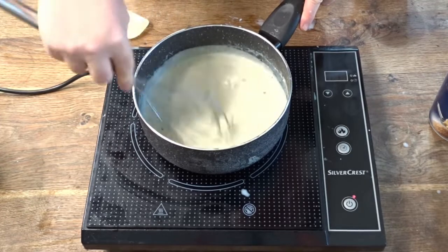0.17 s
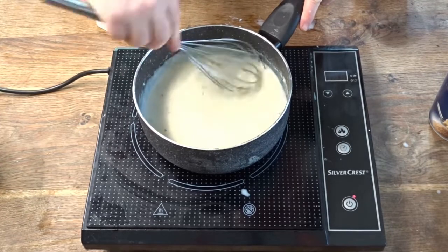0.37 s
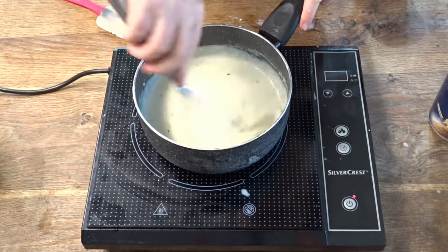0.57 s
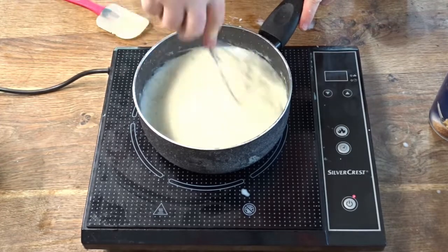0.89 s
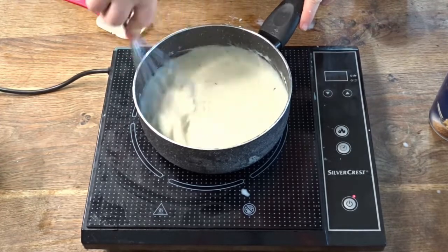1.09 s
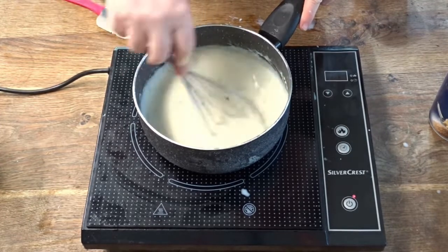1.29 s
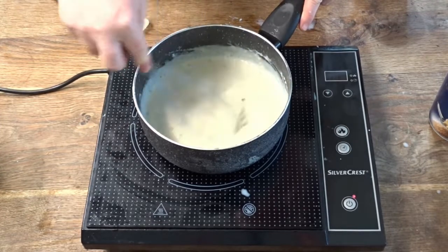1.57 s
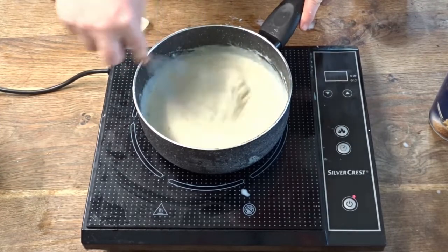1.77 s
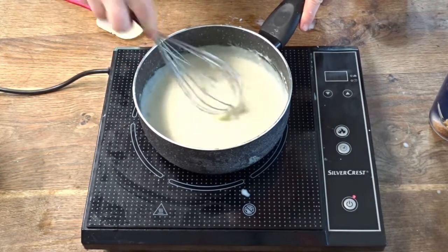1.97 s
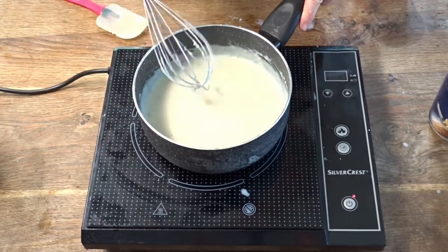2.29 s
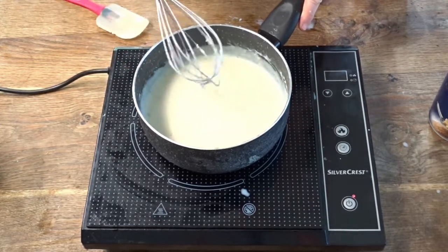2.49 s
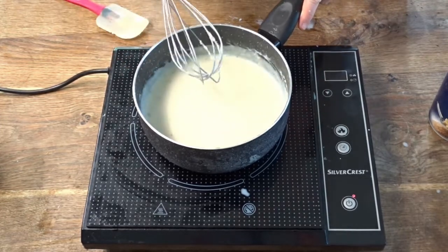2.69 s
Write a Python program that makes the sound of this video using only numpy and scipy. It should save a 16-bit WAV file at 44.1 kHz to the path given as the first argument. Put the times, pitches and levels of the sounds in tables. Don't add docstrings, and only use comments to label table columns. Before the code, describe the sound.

Metal whisk stirring thick sauce in a small pan, quick bright scratchy strokes, then sharp rattling taps

```python
import sys
import numpy as np
from scipy import signal
from scipy.fft import rfft, irfft
from scipy.io import wavfile
from scipy.ndimage import uniform_filter1d

SR = 44100
rng = np.random.default_rng(int(sys.argv[2]) if len(sys.argv) > 2 else 0)


def master_out(mix):
    frames = np.transpose(np.atleast_2d(mix))
    ceiling = np.clip(frames, -1, 1)
    pcm = np.round(ceiling * 32767).astype(np.int16)
    wavfile.write(sys.argv[1], SR, pcm)


def gain_from_db(level_db):
    decades = np.asarray(level_db, float) / 20
    return 10 ** decades


N = 125685

# f/Hz, density/dB
AIR_COLOUR = [(20, -23), (60, -6), (140, -3), (300, -2), (700, -2), (1100, -10), (4000, -13.5),
              (16000, -26)]
# f/Hz, t60/s
KITCHEN_DECAY = [(200, 0.55), (1500, 0.39), (8000, 0.26), (15000, 0.11)]
# f/Hz, level/dB
KITCHEN_WIDTH = [(200, -15), (600, -16), (1400, -16.5), (2800, -13), (5000, -22), (8000, -12.5),
                 (14000, -7)]

# peak t/s, half length/s, pan scrape level/dB, wire jingle level/dB
STROKES = [(0.028, 0.057, -33.5, -44.5), (0.149, 0.02, -30, -39), (0.179, 0.024, -34, -33),
           (0.267, 0.028, -34, -41.5), (0.301, 0.024, -31, -37), (0.382, 0.014, -40.5, -43),
           (0.474, 0.019, -41.5, -35.5), (0.515, 0.0059, -50, -30.5), (0.605, 0.048, -27.5, -24.5),
           (0.71, 0.075, -37, -20.5), (0.794, 0.06, -28.5, -30.5), (0.892, 0.012, -32.5, -21),
           (0.971, 0.067, -35, -35), (1.015, 0.037, -33, -52), (1.138, 0.024, -26.5, -24.5),
           (1.184, 0.024, -25, -25), (1.259, 0.032, -35.5, -34), (1.335, 0.059, -34, -42.5),
           (1.484, 0.029, -31.5, -45), (1.595, 0.021, -31.5, -40), (1.698, 0.028, -28.5, -34.5),
           (1.795, 0.026, -28.5, -35), (1.888, 0.029, -31, -41), (1.94, 0.073, -45.5, -77)]
# peak t/s, half length/s, f/Hz, width/Hz, level/dB
PAN_SWELLS = [(0.043, 0.025, 1500, 70, -34), (.06, .02, 1700, 60, -38), (.476, 0.02, 1545, 35, -46),
              (0.153, 0.012, 1546, 80, -22.5), (0.158, 0.027, 1090, 49.7, -41),
              (0.254, 0.008, 1640, 100, -31), (0.296, 0.021, 1737, 45, -35), (0.318, 0.0056, 835, 79, -48),
              (0.597, 0.011, 1217, 79.5, -30.5), (0.705, 0.0051, 890, 100, -28),
              (0.759, 0.028, 760, 107, -29), (1.053, 0.013, 1540, 79.5, -35.5),
              (1.176, 0.024, 1500, 132, -23.5), (1.156, 0.045, 856, 113, -33),
              (1.354, 0.023, 1540, 100, -36), (1.486, 0.031, 1350, 150, -34.5),
              (1.51, 0.1, 810, 59.7, -46.5), (1.69, 0.052, 1380, 153, -34)]
# peak t/s, half length/s, f/Hz, width/Hz, level/dB
WIRE_CATCHES = [(0.053, 0.014, 8200, 150, -38.5), (0.16, 0.0078, 8500, 150, -42),
                (0.296, 0.018, 5260, 119, -36), (0.47, 0.01, 8800, 197, -45.5),
                (0.575, 0.016, 8300, 200, -28.5), (0.651, 0.045, 8250, 350, -22),
                (0.682, 0.028, 5500, 100, -36), (.78, 0.033, 7950, 250, -30),
                (0.957, 0.048, 8200, 197, -33.5), (1.023, 0.026, 7450, 120, -39.5),
                (1.112, .015, 5560, 50, -36), (1.133, 0.016, 7950, 200, -28),
                (1.182, 0.018, 3300, 500, -27), (1.592, 0.0091, 7600, 80, -33),
                (1.63, 0.021, 5050, 60, -52)]
# f/Hz, level/dB, t60/s
PAN_MODES = [(1211, 4, 0.014), (1486, -2, 0.016), (1650, -4, 0.018), (2824, -8, 0.04), (3340, -4.5, 0.025),
             (5250, -10, 0.02)]
# f/Hz, level/dB, t60/s
WIRE_MODES = [(3046, -5.5, 0.23), (4030, -12, 0.18), (4520, -30, 0.42), (5080, 1, 0.39), (5590, -1.5, 0.4),
              (6700, -15, 0.73), (7560, -15, 0.66), (8500, -2, 0.6)]
# f/Hz, density/dB
SCRATCH_COLOUR = [(180, -79), (300, -44), (584, -20), (737, -8), (1080, -10), (1340, -2), (2480, -10.5),
                  (8360, -10.5), (16000, -22.5)]
# f/Hz, density/dB
JINGLE_COLOUR = [(1180, -77), (2000, -20.5), (5390, -10.5), (6090, -12), (8330, 0), (16000, -33.5)]

# peak t/s, half length/s, f/Hz, width/Hz, level/dB
RUMBLES = [(0.16, 0.053, 383, 25, -51.5), (0.466, 0.017, 405, 23, -45.5), (0.498, 0.028, 253, 20, -48),
           (0.62, 0.026, 290, 30, -49.5), (0.78, 0.063, 392, 37, -41.5), (0.903, 0.019, 269, 35, -43.5),
           (1.1, 0.097, 350, 120, -47), (1.282, 0.025, 378, 23, -46), (2.325, 0.019, 393, 24, -54),
           (2.317, 0.0045, 1530, 80, -39.5), (2.322, 0.0075, 940, 41, -46), (2.621, 0.03, 957, 13, -48),
           (2.3, 0.0041, 1572, 45, -37), (2.592, 0.011, 610, 53, -44), (2.589, .012, 250, 61, -53.5),
           (2.531, .04, 147, 21, -60.5), (2.717, 0.0071, 1562, 55, -36.5)]
# peak t/s, half length/s, f/Hz, width/Hz, level/dB
WIRE_HAZE = [
    (2.15, .15, 2200, 100, -64),
    (2.1, .06, 3865, 20, -69),
    (2.1, .1, 1976, 30, -70),
    (2.45, .1, 3865, 30, -70),
]

# t/s, blow level/dB, rattle level/dB, rattle t60/s, pan share/dB
KNOCKS = [(.451, -49, -38, 0.22, -7), (0.549, -22, -38, .1, -27), (1.0907, -21.5, -17, 0.055, -17),
          (1.0969, -22, -44, 0.12, -18.5), (2.309, -18.5, -28, 0.39, -14), (2.316, -21, -26.5, 0.19, -20),
          (2.375, -31, -45, 0.11, -20), (2.578, -21, -27, 0.47, -13.5), (2.586, -19.5, -31, 0.15, -21),
          (2.64, -25.5, -35, 0.088, -17), (2.7089, -21.5, -30.5, 0.24, -10.5)]
# t/s, level/dB
CLICKS = [
    (0.383, -52),
    (.4514, -39),
    (.5162, -49),
    (.88, -36),
    (1.3867, -36),
    (1.459, -43),
    (1.7918, -32),
    (1.811, -32),
    (2.3125, -26),
]
# t/s, level/dB
CRACKS = [
    (1.0895, -31),
    (1.0955, -32),
    (2.308, -31),
    (2.5768, -32),
    (2.5835, -35),
    (2.7078, -33),
]
# f/Hz, level/dB, t60/s
STRUCK_TIP = [(1200, -20, .3), (3063, -11, .24), (3774, -9, .17), (4533, -11, .28), (5103, -12, .22),
              (5588, -1, .25), (6670, -9, .28), (7515, -3, .3), (7897, -3, .36), (8775, 0, .19),
              (10220, -13, .24), (11970, -17, .27)]
# f/Hz, level/dB, t60/s
STRUCK_BELLY = [(958, -13, .3), (1572, -13, .22), (3058, -15, .25), (4570, -16, .25), (5599, -19, .3),
                (6697, -1, .35), (7843, -7, .4), (8253, -1, .26), (8516, -11, .4), (8947, 0, .2),
                (9313, 0, .2), (10320, -11, .23)]
# f/Hz, level/dB, t60/s
STRUCK_NECK = [(1567, -10, .1), (3499, -17, .15), (5561, -21, .16), (6702, -15, .25), (7472, -7, .2),
               (7843, -5, .4), (8290, 0, .24), (9308, -16, .3), (11860, -20, .2)]
# f/Hz, density/dB
TICK_COLOUR = [(300, -45), (1500, -25), (5500, -13), (8100, 4), (11000, -9), (16000, -16)]
# f/Hz, density/dB
CRACK_COLOUR = [(1000, -25), (5000, -4), (8500, 3), (13500, 2), (16000, 0)]

# f/Hz, level/dB
SINGING_WIRES = [(2196, -67), (3860, -61), (5803, -69), (6347, -61), (7790, -69)]

AIR_DB, AIR_WIDTH, ROOM_DB = -52.5, 0.23, -10
SLIPS_PER_S, JINGLES_PER_S, SLIP_SPREAD_DB = 3500, 3100, 2.2
RATTLES_PER_S, RATTLE_SPREAD_DB = 2600, 1.4
SCRATCH_DB, CLUSTER_DB, PATCHY_DB = 3, 7, 2.5
BLOW_RING_DB, BLOW_CRACK_DB = -2.5, 0
SING_S, SING_T60 = 2.222, 0.22
DRIP_S, DRIP_HZ, DRIP_DB, DRIP_T60 = 2.162, 11100, -32, 0.0022
TOUCH_SIZE, PAN_SIZE = 12000, 3000


def evened(x):
    return x / np.sqrt(np.mean(x ** 2) + 1e-20)


def unit(x):
    return x / np.linalg.norm(x)


def lengthened(x, size):
    return np.pad(x, (0, size - len(x)))


def read(points, hz):
    f, value = np.transpose(points)
    return np.interp(np.log(hz + 1), np.log(f + 1), value)


def coloured(x, points):
    size = x.shape[-1]
    return irfft(rfft(x) * gain_from_db(read(points, np.fft.rfftfreq(size, 1 / SR))), size)


def impulse(s, db):
    return (np.arange(N) == round(s * SR)) * gain_from_db(db)


def bumps(peaks, halves, dbs):
    t = np.arange(N)[:, None] / SR
    power = gain_from_db(2 * np.asarray(dbs)) * np.exp(-((t - peaks) / halves) ** 2)
    return np.sqrt(power.sum(1))


def ring(modes, size=TOUCH_SIZE, scatter=0.003):
    hz, db, t60 = np.transpose(modes)[:, :, None]
    t = np.arange(size) / SR
    luck = rng.standard_normal((len(hz), 2))
    level = gain_from_db(db - 60 * t / t60 + 3 * luck[:, :1])
    tuned = hz * (1 + scatter * luck[:, 1:])
    return (level * np.sin(2 * np.pi * tuned * t)).sum(0)


def burst(points, t60, size=1024):
    noise = rng.standard_normal(size) * gain_from_db(-60 * np.arange(size) / SR / t60)
    return np.roll(coloured(noise, points), 60)


def touches(per_s, spread_db):
    chance, sign, luck = rng.random((N, 3)).T
    strength = gain_from_db(spread_db * np.minimum(-np.log(luck + 1e-9), 5))
    return evened((chance < per_s / SR) * np.sign(sign - 0.5) * strength)


def strike(drive, bodies):
    spot = rng.integers(0, len(bodies), N)
    return sum(signal.oaconvolve(drive * (spot == k), b)[:N] for k, b in enumerate(bodies))


def swells(drive, rows):
    out = np.zeros(N)
    for s, half, hz, width, db in rows:
        effort = bumps(s, half, [db])
        sound = signal.lfilter(*signal.iirpeak(hz, hz / width, SR), drive * effort)
        out += unit(sound) * np.linalg.norm(effort)
    return out


def patchy(x):
    z = signal.stft(x, nperseg=256)[2]
    field = uniform_filter1d(rng.standard_normal(z.shape), size=4, axis=0)
    field = evened(uniform_filter1d(field, size=12, axis=1))
    return signal.istft(z * gain_from_db(PATCHY_DB * field), nperseg=256)[1][:N]


def air():
    common, different = rng.standard_normal((2, N))
    x = np.array([common + AIR_WIDTH * different, common - AIR_WIDTH * different])
    return gain_from_db(AIR_DB) * evened(coloured(x, AIR_COLOUR))


def kitchen(x):
    taps = np.zeros((2, SR // 2))
    at = np.arange(200, SR // 2 - 20, 20) + rng.integers(0, 20, (2, (SR // 2 - 201) // 20))
    np.put_along_axis(taps, at, rng.choice([-1., 1.], at.shape), 1)
    hz, t, z = signal.stft(taps, SR, nperseg=256)
    decay = gain_from_db(-60 * t / read(KITCHEN_DECAY, hz)[:, None])
    tail = signal.istft(z * decay, SR, nperseg=256)[1]
    mid, side = signal.fftconvolve(x[None], tail / np.linalg.norm(tail[0]), axes=1)[:, :N]
    return gain_from_db(ROOM_DB) * mid + np.array([[1], [-1]]) * coloured(side, KITCHEN_WIDTH)


def pan_spots(count=10):
    spots = []
    for _ in range(count):
        tone = unit(ring(PAN_MODES, PAN_SIZE, scatter=0.05))
        scratch = lengthened(unit(burst(SCRATCH_COLOUR, 0.012)), PAN_SIZE)
        spots.append(unit(tone + gain_from_db(SCRATCH_DB) * scratch))
    return spots


def wire_spots(lines, hz, spread_hz, t60, damping, tick, tick_db, count=4):
    loops = [(hz + spread_hz * np.tan(u), 0, t60) for u in np.linspace(-1.1, 1.1, num=70)]
    pairs = np.array(lines + lines) * [1, 1, damping]
    spots = []
    for _ in range(count):
        tone = unit(ring(pairs)) + gain_from_db(CLUSTER_DB) * unit(ring(loops))
        brush = lengthened(unit(burst(tick, 0.013)), TOUCH_SIZE)
        spots.append(unit(tone + gain_from_db(tick_db) * brush))
    return spots


def stirring(pan):
    s, half, pan_db, wire_db = np.transpose(STROKES)
    slips = touches(SLIPS_PER_S, SLIP_SPREAD_DB)
    jingles = touches(JINGLES_PER_S, SLIP_SPREAD_DB)
    wires = wire_spots(WIRE_MODES, hz=8130, spread_hz=360, t60=0.083, damping=0.26,
                       tick=JINGLE_COLOUR, tick_db=8)
    scrape = strike(slips * bumps(s, half, pan_db), pan)
    jingle = strike(jingles * bumps(s, half, wire_db), wires)
    return swells(slips, PAN_SWELLS + WIRE_CATCHES) + patchy(scrape + jingle)


def rumble():
    return swells(rng.standard_normal(N), RUMBLES + WIRE_HAZE)


def knocks(pan):
    t, out = np.arange(N) / SR, np.zeros(N)
    clatter = touches(RATTLES_PER_S, RATTLE_SPREAD_DB)
    crack = unit(burst(CRACK_COLOUR, 0.0022))
    rows = np.array(KNOCKS)
    place = np.searchsorted([2.5, 2.7], rows[:, 0])
    for k, lines in enumerate((STRUCK_TIP, STRUCK_BELLY, STRUCK_NECK)):
        drive, blows, push = np.zeros((3, N))
        for s, blow_db, rattle_db, t60, pan_db in rows[place == k]:
            blow = impulse(s, blow_db + 16)
            shake = blow + clatter * (t > s) * gain_from_db(rattle_db - 60 * abs(t - s) / t60)
            drive += shake
            blows += blow
            push += gain_from_db(pan_db) * shake
        wires = wire_spots(lines, hz=7830, spread_hz=130, t60=0.2, damping=0.88,
                           tick=TICK_COLOUR, tick_db=5.5, count=2)
        body = gain_from_db(BLOW_RING_DB) * unit(ring(3 * lines, scatter=0.004))
        body += gain_from_db(BLOW_CRACK_DB) * lengthened(crack, TOUCH_SIZE)
        out += strike(drive, wires)
        out += signal.oaconvolve(blows, body)[:N]
        out += signal.oaconvolve(push, pan[k])[:N]
    clicks = sum(impulse(s, db + 25) for s, db in CLICKS + CRACKS)
    return patchy(out) + signal.oaconvolve(clicks, crack)[:N]


def lifting():
    t = np.arange(N) / SR
    since_drip, since_sing = np.maximum(t - DRIP_S, 0), np.maximum(t - SING_S, 0)
    drip = gain_from_db(DRIP_DB - 60 * since_drip / DRIP_T60) * np.sin(2 * np.pi * DRIP_HZ * since_drip)
    sing = np.zeros(N)
    for hz, db in SINGING_WIRES:
        beat = np.cos(2 * np.pi * (rng.uniform(15, 30.1) * t + rng.random()))
        sing += gain_from_db(db + 11) * (1 + 0.5 * beat) * np.sin(2 * np.pi * hz * t)
    fade = np.minimum(since_sing / 0.014, 1) * gain_from_db(-60 * since_sing / SING_T60)
    return drip + sing * fade


def scene():
    pan = pan_spots()
    low_cut = signal.butter(4, 318, "high", fs=SR, output="sos")
    metal = signal.sosfilt(low_cut, stirring(pan) + knocks(pan))
    near = metal + rumble() + lifting()
    return near + kitchen(near) + air()


def low_pass(x):
    return signal.sosfilt(signal.butter(12, 17000, fs=SR, output="sos"), x)


def record(dry):
    edge = signal.firwin(301, 15780, window=("kaiser", 6), fs=SR)
    mix = signal.oaconvolve(dry, edge[None], "same")
    return low_pass(mix)


dry = scene()
out = record(dry)
master_out(out)
```